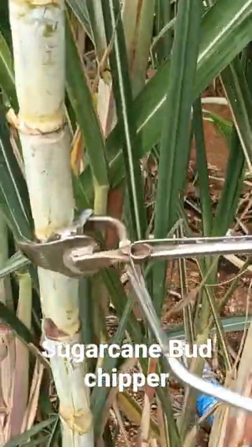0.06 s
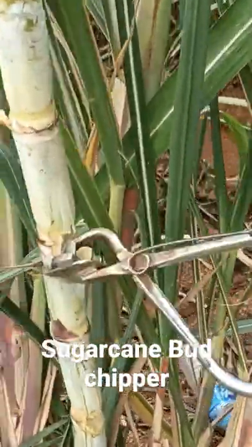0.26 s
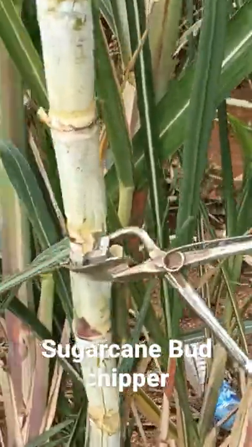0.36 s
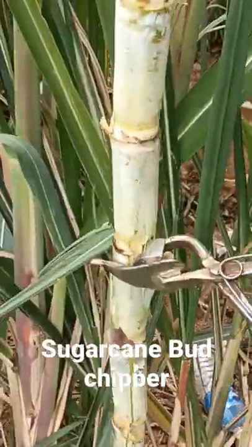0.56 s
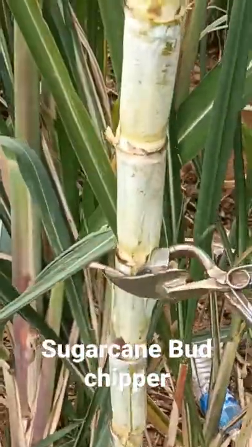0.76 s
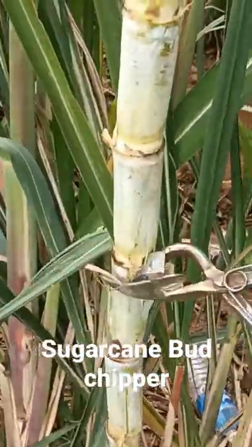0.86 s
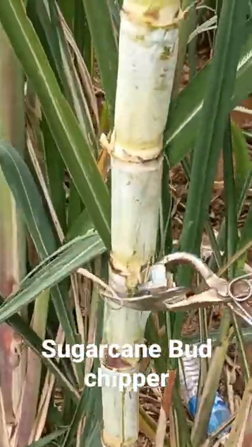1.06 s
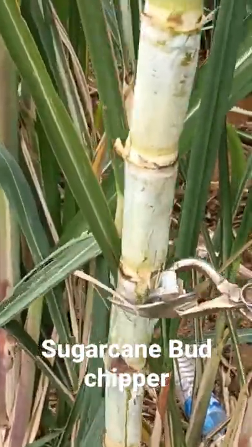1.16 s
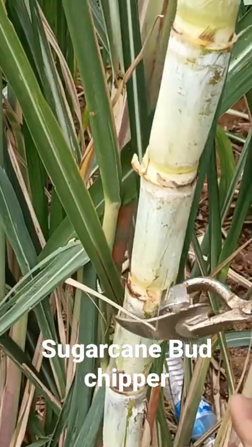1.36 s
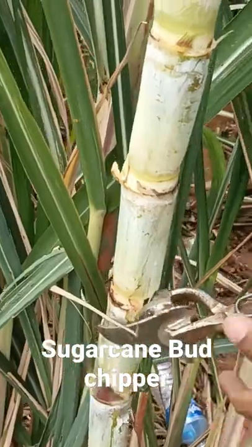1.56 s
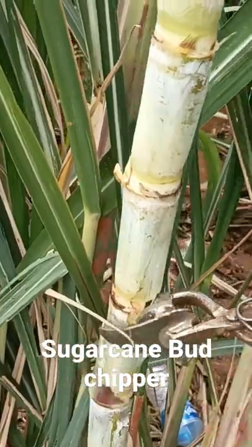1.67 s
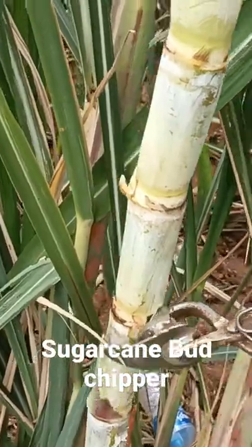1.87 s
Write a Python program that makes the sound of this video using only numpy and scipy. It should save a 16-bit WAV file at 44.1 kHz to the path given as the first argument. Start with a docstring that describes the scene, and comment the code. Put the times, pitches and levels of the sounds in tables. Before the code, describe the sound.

Close by in a field, sugarcane snaps and crunches under a steel cutter. Afterwards the shaken leaves rustle softly, with a few dry ticks, light metal clinks and low puffs of wind on the microphone.

```python
"""A few ticks, then a quick run of loud cracks: a steel bud chipper bites into a standing sugarcane stalk.
Close by, the hard rind snaps and the soft pith is crushed; the cracks ring the tool and knock the stalk.
The shaken leaves rustle, tick and settle while the tool clinks lightly. Behind it all are a few puffs
of wind on the right microphone, the steady hiss of the field and a low rumble."""
import sys
import numpy as np
from scipy import signal
from scipy.fft import rfft, irfft
from scipy.io import wavfile
from scipy.ndimage import uniform_filter1d, map_coordinates

SR = 44100
rng = np.random.default_rng(int(sys.argv[2]) if len(sys.argv) > 2 else 0)


def unload_audio(sound):
    """Save the sound as a 16-bit wav file, at the path given as the first command line argument."""
    columns = np.transpose(np.atleast_2d(sound))
    # keep every value between -1 and 1, then stretch to whole-number steps
    steps = np.round(np.clip(columns, -1, 1) * 32767)
    wavfile.write(sys.argv[1], SR, steps.astype(np.int16))


N = 83790
T = np.arange(N) / SR
HZ = np.fft.rfftfreq(2 * N, 1 / SR)
FIBRES_PER_S = 9000


# Cracks in the rind. Each row: start in seconds, level in dB, seconds the tear keeps running.
CRACKS = [(0.1511, -27, 0.0011), (0.1639, -25.5, 0.0024), (0.175, -30, 0.0033), (0.187, -28, 0.0034),
          (0.1999, -11.5, 0.0043), (0.212, -14, 0.003), (0.2138, -19.5, 0.0058), (.2170, -18.5, 0.0055),
          (0.2212, -11, 0.00084), (0.2264, -18, 0.0039), (0.2328, -12, 0.0014), (0.2344, -10.5, 0.0016),
          (0.2407, -15.5, 0.003), (0.282, -25, 0.00058)]
# The tone of the snapping rind. Each row: frequency in Hz, level in dB.
RIND_TONE = [(60, -29), (130, -7), (290, -16), (500, -14.5), (900, -19), (1400, -20), (2000, -13.5),
             (3000, -5), (3700, 0.5), (4900, 6.5), (5500, 2), (6100, 3.5), (6900, -3.5), (7500, -6.5),
             (8100, -21)]
# The notes of the steel tool. Each row: pitch in Hz, level in dB, seconds to fade by 60 dB.
STEEL_NOTES = [(3820, -6, 0.089), (4780, 2.5, 0.27), (4780, -6, 0.08), (5074, -21, .22), (5270, -9, .12),
               (5900, -16, .2), (6060, 3.5, 0.42), (6100, 9.5, 0.17), (6140, -21, .16), (6110, 9, 0.089),
               (6675, 10.5, 0.17)]
# The notes of the knocked stalk. Each row: pitch in Hz, level in dB, seconds to fade by 60 dB.
STALK_NOTES = [(127, -11.5, 0.1), (171.4, 0, 0.061), (435, -16, 0.097), (528, 0, 0.17), (672.5, -4, 0.065),
               (920, 2, 0.066)]
# How alike close sounds are left and right. Each row: frequency in Hz, likeness (1 is identical).
NEAR_LIKENESS = [(100, 0.81), (700, 0.69), (2200, 0.6), (4000, 0.82), (6500, 0.31)]

def cut():
    """Rind fibres snap in quick runs over the crushed pith, making the steel and the stalk ring."""
    crack_power = sum((amp(db) * burst(start, hold, fade_s=0.03)) ** 2 for start, db, hold in CRACKS)
    snaps = spread(grains(FIBRES_PER_S) * np.sqrt(crack_power), NEAR_LIKENESS)
    rind = filtered(snaps, colour(RIND_TONE))
    steel = amp(-13.5) * ring(snaps, STEEL_NOTES)
    stalk = amp(-26) * ring(snaps.mean(axis=0), STALK_NOTES)
    return rind + crushed_pith() + steel + stalk


# How the crunch swells and fades. Each row: time in seconds, level in dB.
CRUSH_LEVELS = [(.12, -79), (.14, -45.5), (.17, -38), (.198, -44.5), (.205, -28.5), (.245, -27),
                (.268, -32), (.29, -39), (.32, -56.5), (.36, -65)]
# The tone of the crunch. Each row: frequency in Hz, level in dB.
PITH_TONE = [(50, -6.5), (140, 1), (290, -12.5), (500, -3.5), (1000, -4.5), (2200, 1), (4000, 1),
             (6200, 4.5), (8100, -13)]

def crushed_pith():
    """The blade crushes the soft inside of the stalk: a crunch of many tiny snaps."""
    crunch = grains(per_second=2500) * level(CRUSH_LEVELS)
    return filtered(spread(crunch, NEAR_LIKENESS), colour(PITH_TONE))


# Light knocks of the tool. Each row: start in seconds, level in dB, seconds of contact.
CLINKS = [(0.74, -39, 0.0048), (0.7505, -41.5, 0.0023), (0.7557, -44.5, 0.0069), (.864, -49, 0.0073),
          (1.4157, -45.5, 0.0024), (1.4646, -55.5, 0.0019), (1.5025, -49, 0.0009), (1.521, -43.5, 0.0014),
          (1.6437, -53, 0.0046), (1.8685, -51, 0.0019), (1.88, -47.5, 0.00084), (1.891, -47.5, 0.0016)]
# The tone of each contact. Each row: frequency in Hz, level in dB.
CLINK_TONE = [(300, -38), (1200, -12), (4000, -7.5), (5200, -1.5), (6000, 3.5), (6900, -8), (8100, -14.5)]

def clinks():
    """The jaws and pivot knock lightly and ring the steel as the tool is eased away."""
    contact = sum(amp(db) * burst(start, hold, fade_s=0.022) for start, db, hold in CLINKS)
    scrape = spread(grains(FIBRES_PER_S) * contact, NEAR_LIKENESS)
    return filtered(scrape, colour(CLINK_TONE)) + amp(-2) * ring(scrape, STEEL_NOTES)


# How the rustle follows the swaying stalk. Each row: time in seconds, level in dB.
SWAY_LEVELS = [(.12, -65), (.25, -40.5), (.318, -40.5), (.337, -41.5), (.364, -32.5), (.381, -34.5),
               (.395, -46.5), (.42, -47), (.452, -51), (.478, -52), (.495, -47), (.515, -42.5), (.552, -37),
               (.585, -41.5), (.62, -45), (.642, -53), (.672, -54.5), (.70, -46.5), (.728, -52.5),
               (.76, -47), (.82, -55), (.885, -50.5), (.97, -57), (1.06, -55), (1.2, -66.5), (1.48, -60),
               (1.54, -55.5), (1.67, -58), (1.75, -65.5), (1.9, -57)]
# The tone of the rustle. Each row: frequency in Hz, level in dB.
LEAF_TONE = [(200, -28.5), (700, -21), (1200, -15), (1900, -9.5), (2600, 0), (3400, -1.5), (5000, -3.5),
             (6300, -2.5), (7200, -4), (8100, -17.5)]
# How alike sounds from all round are left and right. Each row: frequency in Hz, likeness (0 to 1).
FAR_LIKENESS = [(60, 0.71), (400, .72), (1000, 0.23), (2000, 0.08), (6000, 0.087)]

def rustling_leaves(flutter_hz=60, flutter_db=1.3):
    """Leaves slide over each other in thousands of tiny catches that swell as the stalk sways."""
    flutter = map_coordinates(rng.standard_normal(1024), [T * flutter_hz], mode="wrap")  # smooth wobble
    rub = patchy(grains(per_second=5000), depth_db=5) * amp(flutter_db * flutter)
    rustle = filtered(spread(rub, FAR_LIKENESS), colour(LEAF_TONE))
    return unit(rustle) * level(SWAY_LEVELS)


# Ticks of dry leaves and stems. Each row: start in seconds, level in dB, pitch in Hz.
DRY_TICKS = [(0.4923, -42, 2570), (0.6985, -39, 2900), (0.7364, -42, 2550), (1.359, -50, 2460),
             (1.4177, -47.5, 1490), (1.493, -51.5, 2830)]

def dry_ticks(sharpness=4):
    """Each dry leaf or stem ticks with a short burst of noise in a broad band around one pitch."""
    ticks = np.zeros((2, N))
    for start, db, hz in DRY_TICKS:
        damping = 1j * HZ * hz / sharpness
        band = damping / (hz ** 2 - HZ ** 2 + damping)
        noise = unit(filtered(rng.standard_normal((2, N)), band))
        ticks += amp(db) * burst(start, 0, fade_s=0.037) * noise
    return spread(ticks, NEAR_LIKENESS)


# Puffs of wind. Each row: time of the peak in seconds, level in dB, half length in seconds.
PUFFS = [(0.846, -43, 0.02), (1.09, -55.5, 0.13), (1.223, -30, 0.011), (1.267, -46, 0.027),
         (1.52, -53, 0.098), (1.676, -44.5, 0.034)]
# The deep tone of the puffs. Each row: frequency in Hz, level in dB.
WIND_TONE = [(15, -5), (40, 3), (70, -5), (120, -13.5), (200, -43), (500, -63), (2000, -100)]

def wind(left_db=-24):
    """Wind buffets the right microphone in soft, low puffs and barely touches the left."""
    gusts = sum(amp(db) * np.exp(-.5 * ((T - peak) / half) ** 2) for peak, db, half in PUFFS)
    buffet = unit(filtered(rng.standard_normal((2, N)), amp(along(WIND_TONE))))
    return gusts * buffet * amp([[left_db], [0]])


def cane_echo(sound, fade_s=0.29, rise_s=0.0062):
    """The surrounding cane scatters a sound back as a short, blurred echo."""
    tail = rng.standard_normal((2, N)) * amp(-60 * T / fade_s) * (1 - np.exp(-T / rise_s))
    return filtered(sound, rfft(tail / np.linalg.norm(tail[0]), 2 * N))


# The tone of the field's hiss. Each row: frequency in Hz, level in dB.
HISS_TONE = [(200, -1), (300, -6.5), (450, -3.5), (700, -9.5), (1100, -4), (1700, -2.5), (2500, 2.5),
             (3500, -1.5), (5000, -4), (6500, -2.5), (7400, -14), (8100, -26)]
# The tone of the low rumble. Each row: frequency in Hz, level in dB.
RUMBLE_TONE = [(20, 1), (45, 1), (80, -8.5), (115, -2.5), (170, -14), (260, -28), (600, -34), (2000, -82.5)]

def background():
    """Steady outdoor noise: a faint hiss over a low rumble."""
    def layer(tone, depth_db):
        noise = spread(patchy(rng.standard_normal((2, N)), depth_db), FAR_LIKENESS)
        return unit(filtered(noise, amp(along(tone))))
    return amp(-60) * layer(HISS_TONE, depth_db=0.5) + amp(-59) * layer(RUMBLE_TONE, depth_db=2.0)


def amp(db):
    """Turn decibels into a number to multiply by."""
    return 10 ** (np.asarray(db) / 20)


def unit(x):
    """Scale a signal to an average (rms) level of 1."""
    return x / np.sqrt(np.mean(x ** 2) + 1e-20)


def along(points):
    """Join rows of frequency and value into a curve, on a log frequency scale."""
    hz, values = np.transpose(points)
    return np.interp(np.log(HZ + 1), np.log(hz + 1), values)


def level(points):
    """Join rows of seconds and dB into a gain for every sample."""
    return amp(np.interp(T, *np.transpose(points)))


def filtered(x, response):
    """Multiply each frequency in a signal by the filter's response."""
    return irfft(rfft(x, 2 * N) * response)[..., :N]


def colour(tone):
    """Make a filter that gives noise this tone at about the same power."""
    gain = amp(along(tone))
    gain /= np.sqrt(np.mean(gain ** 2 * (HZ < TOP_HZ)))
    cepstrum = irfft(np.log(gain + 1e-6))
    # Folding onto the first half keeps the filter from sounding before it is struck.
    cepstrum[1:N] *= 2
    cepstrum[N + 1:] = 0
    return np.exp(rfft(cepstrum))


def spread(pair, likeness):
    """Blend two unrelated signals into a left and a right of the given likeness."""
    angle = np.arccos(np.clip(along(likeness), -1, 1)) / 2
    mid, side = filtered(pair, np.array([np.cos(angle), np.sin(angle)]))
    return np.array([mid + side, mid - side])


def grains(per_second):
    """Make two streams of tiny snaps that share the same random moments."""
    return unit(rng.standard_normal((2, N)) * (rng.random(N) < per_second / SR))


def patchy(x, depth_db):
    """Make random patches of time and frequency louder or softer."""
    spectra = signal.stft(x, nperseg=512)[2]
    patches = uniform_filter1d(rng.standard_normal(spectra.shape[1:]), size=6, axis=0)
    patches = unit(uniform_filter1d(patches, size=8, axis=1))
    uneven = signal.istft(spectra * amp(depth_db * patches), nperseg=512)[1]
    return unit(uneven[:, :N])


def burst(start, hold, fade_s, rise_s=0.00045):
    """A level that jumps up, holds, then falls 60 dB every fade_s seconds."""
    rise = np.clip((T - start) / rise_s, 0, 1)
    return rise * amp(-60 * np.maximum(T - start - hold, 0) / fade_s)


def ring(x, notes):
    """Let a signal set off an object's fading notes, keeping its average level."""
    one_strike = sum(amp(db - 60 * T / fade_s) * np.sin(2 * np.pi * hz * T) for hz, db, fade_s in notes)
    return np.std(x) * unit(filtered(x, rfft(one_strike, 2 * N)))


def scene(left_delay_s=0.00011):
    """The tool and stalk sit a little to one side, with leaves and field all round."""
    near = cut() + clinks() + dry_ticks()
    near = filtered(near, np.exp(-2j * np.pi * HZ * np.array([[left_delay_s], [0]])))
    outdoors = background()
    return near + amp(-21) * cane_echo(near) + rustling_leaves() + wind() + outdoors


# How much louder the left microphone is than the right. Each row: frequency in Hz, difference in dB.
LEFT_OVER_RIGHT = [(60, 1), (800, -2), (2200, 5), (3300, 5.5), (5200, 5), (5900, 8.5), (6700, 24),
                   (7400, -3.5), (8100, -13)]
PEAK_LIMIT, TOP_HZ = 0.96, 8280

def record(dry):
    """The two microphones differ in the treble; peaks are rounded off and the highest sounds are cut."""
    ratio = amp(along(LEFT_OVER_RIGHT))
    balance = np.array([ratio, np.ones_like(ratio)]) * np.sqrt(2 / (1 + ratio ** 2))
    heard = filtered(dry, balance * (HZ < TOP_HZ))
    rounded = heard / (1 + np.abs(heard / PEAK_LIMIT) ** 6) ** (1 / 6)
    return filtered(rounded, 1 / np.sqrt(1 + (HZ / TOP_HZ) ** 80))


dry = scene()
out = record(dry)
unload_audio(out)
```